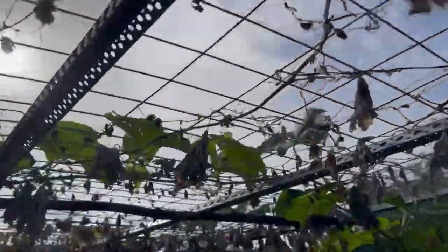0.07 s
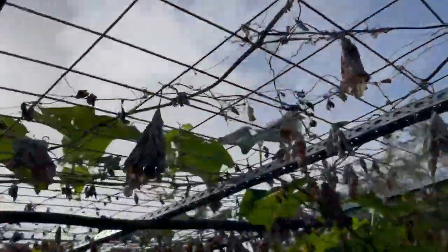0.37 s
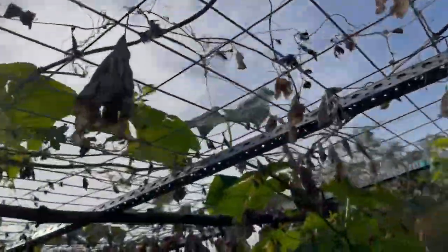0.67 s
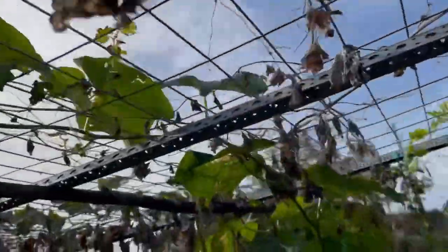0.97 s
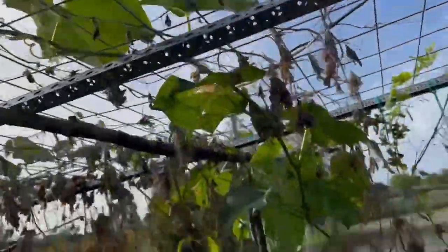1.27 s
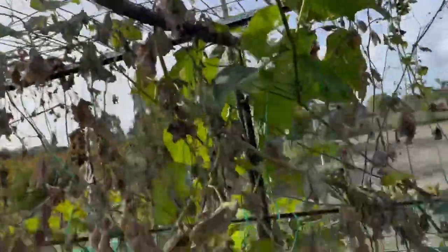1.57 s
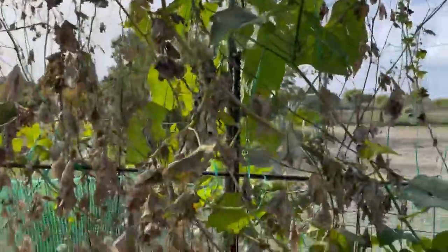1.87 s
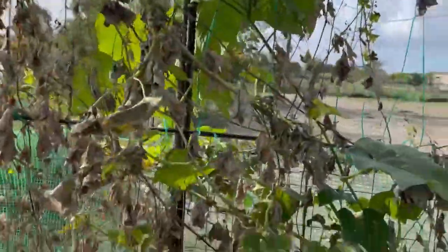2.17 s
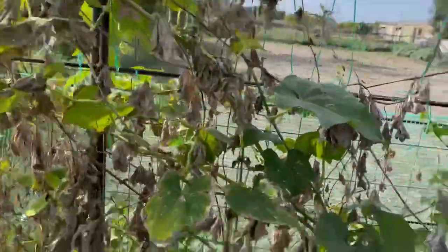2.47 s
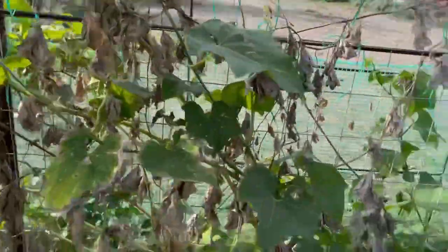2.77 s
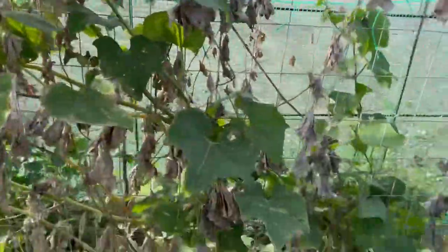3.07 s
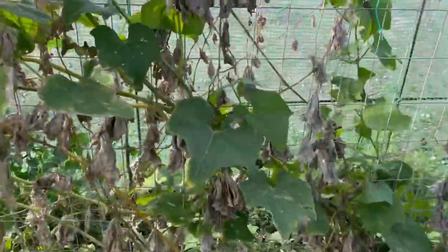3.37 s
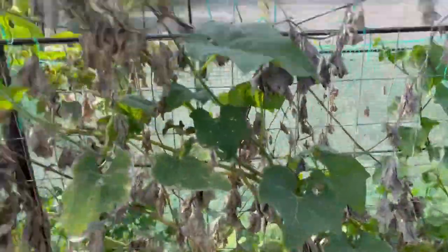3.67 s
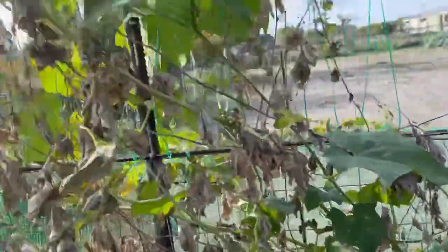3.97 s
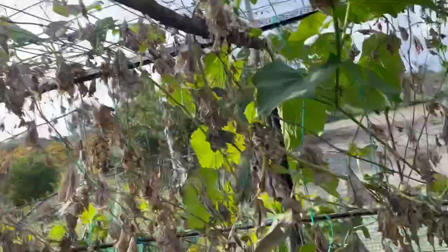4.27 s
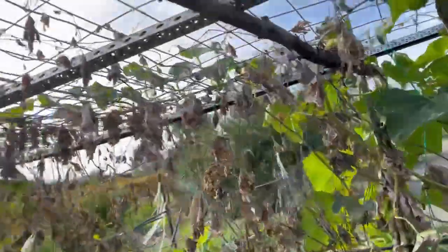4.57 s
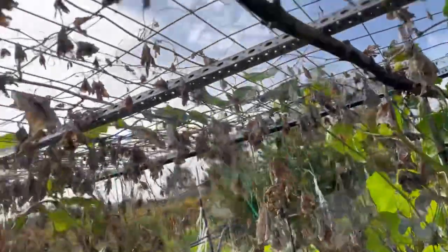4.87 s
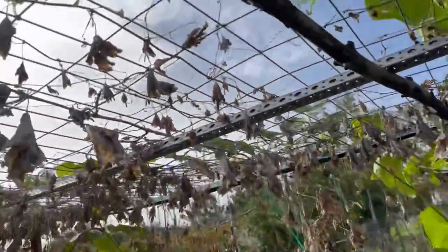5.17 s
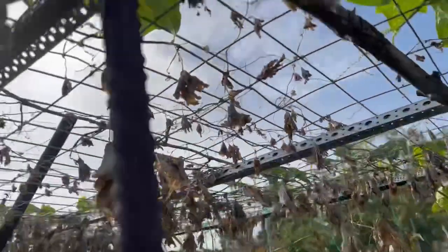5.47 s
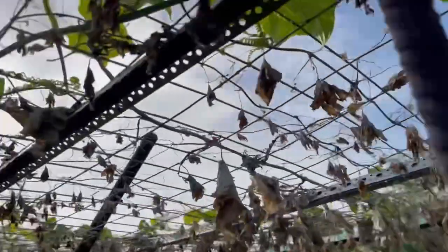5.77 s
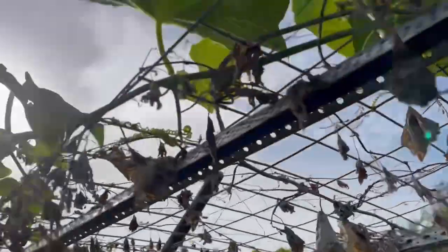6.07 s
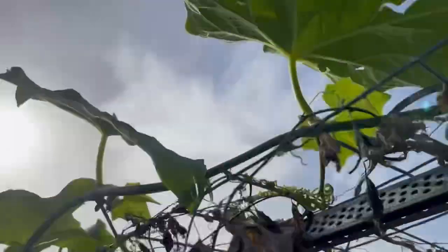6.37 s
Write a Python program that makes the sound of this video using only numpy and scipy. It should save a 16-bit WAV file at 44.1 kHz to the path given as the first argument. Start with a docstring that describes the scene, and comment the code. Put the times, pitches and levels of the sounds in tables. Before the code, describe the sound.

On a farm, a rooster crows once, close and loud: two quick notes, then a long hoarse one that clears, sinks and breaks off in a squawk. Before it, for well over three seconds, gusts buffet the microphone with a low rumble, over faint ticks of dry vine leaves and very faint far-off birds. After the crow the wind fades, leaving one soft rustle.

```python
"""A rooster crows once, in three syllables, near a trellis of half-dry vines on a farm.
The two sides of its syrinx clash into a rasp, then one side alone holds a clean falling note that
ends in a squawk; windpipe and beak colour the pulses, and trellis and yard scatter the call.
Wind buffets the microphone, dry leaves rustle, and far off there are faint birds and a hum."""
import sys
import numpy as np
from scipy import signal
from scipy.fft import rfft, irfft, next_fast_len
from scipy.io import wavfile
from scipy.ndimage import uniform_filter1d

SR = 44100
rng = np.random.default_rng(int(sys.argv[2]) if len(sys.argv) > 2 else 0)


def persist_wave(psi):
    """Save psi, clipped to +-1, as 16-bit WAV."""
    counts = np.round(np.clip(psi, -1, 1) * 32767).astype(np.int16)
    wavfile.write(sys.argv[1], SR, np.atleast_2d(counts).T)


N = 287973
TIME = np.arange(N) / SR
HZ = np.maximum(np.arange(N // 2 + 1) * SR / N, 1)
BREEZE_DB = -30   # typical wind strength
RASP_START_S, NOTE_START_S, SQUAWK_START_S, SQUAWK_END_S = 4.192, 5.277, 5.545, 5.585

# wind strength at the microphone: t/s, level/dB
GUSTS = [(0, -35), (.17, -35.5), (.31, -33), (.56, -30), (.63, -36.5), (.86, -30), (1.05, -29.5),
         (1.2, -37.5), (1.31, -30.5), (2.05, -30), (2.25, -27), (2.39, -32), (2.52, -26), (2.75, -27),
         (3.1, -33.5), (3.35, -35), (3.5, -37), (3.88, -32.5), (5.15, -33), (5.55, -42), (5.95, -46),
         (6.53, -60.5)]
# the straining membranes flutter ever slower and deeper: t/s, rate/Hz, depth at full roughness/dB
CATCHES = [(4.2, 75, .5), (4.7, 65, 1), (4.84, 53, 2.8), (5.0, 42, 2.5), (5.15, 38, 2.2), (5.25, 34, 7)]
# two short syllables: start/s, end/s, rise/s, upper side grips/s, lets go/s, upper f/Hz, lower f/Hz,
# pitch arch/share, upper side's share/0-1, roughness/0-1, fundamental/dB, throat/dB, edge/dB
OPENERS = [(3.705, 3.869, 0.028, 3.754, 3.838, 680, 597.7, .04, 0.65, .55, -26.5, -31, -47.5),
           (3.972, 4.086, 0.019, 3.993, 4.082, 733, 630.7, .035, 1, 0.05, -22.3, -24.8, -47)]


def from_db(db):
    """Decibels to gain."""
    return 10 ** (np.asarray(db) / 20)


def rms_one(x):
    """Scale to rms 1."""
    return x / np.sqrt(np.mean(x ** 2) + 1e-20)


def in_time(rows):
    """Automation lanes: each column of a curve at every sample."""
    s, *columns = np.transpose(rows)
    return [np.interp(TIME, s, c) for c in columns]


def phase_of(hz):
    """Running phase of a gliding frequency, in radians."""
    return 2 * np.pi * np.cumsum(hz) / SR


def filtered(x, response):
    """EQ with a response given on the HZ grid."""
    size = next_fast_len(N, True)
    grid = np.arange(size // 2 + 1) * SR / size
    return irfft(rfft(x, size) * np.interp(grid, HZ, response), size)[..., :N]


def drift(rate_hz):
    """Random wander up to a rate; rms 1."""
    return rms_one(filtered(rng.standard_normal(N), 1 / (1 + (HZ / rate_hz) ** 2)))


def noise(spectrum, alike):
    """Coloured stereo noise; alike is its left-right correlation."""
    hz, db = np.transpose(spectrum)
    skirts = np.minimum(HZ / hz[0], 1) ** 4 * np.minimum(hz[-1] / HZ, 1) ** 4
    colour = from_db(np.interp(np.log(HZ), np.log(hz), db)) * skirts
    mid, side = filtered(rng.standard_normal((2, N)), colour)
    width = np.sqrt((1 - alike) / (1.001 + alike))
    return rms_one(mid) + width * rms_one(side) * [[1], [-1]]


def evened(stereo, window_s):
    """Leveller: hold the slow level at 1 and keep the fast flutter."""
    power, size = stereo.mean(0) ** 2, int(window_s * SR)
    return stereo / np.sqrt(np.abs(uniform_filter1d(uniform_filter1d(power, size), size)) + 1e-12)


def bursts(rows, rise_s):
    """Envelope of events (t/s, level/dB, fade/s) that swell quickly and die away."""
    out = np.zeros(N)
    for s, db, fade_s in rows:
        start = int(s * SR)
        age = TIME[:min(N - start, SR // 2)]
        out[start:start + len(age)] += from_db(db) * (1 - np.exp(-age / rise_s)) * np.exp(-age / fade_s)
    return out


def surroundings():
    """The bed: a wash of open fields, an airy flickering hiss and a distant wavering hum."""
    # colours of the fields and of the hiss: f/Hz, density/dB
    field_colour = [(60, -17), (250, 5), (430, 1), (600, 9), (800, 2.5), (1000, 2), (1500, -3), (2200, -11),
                    (3500, -22.5), (6000, -17.5)]
    hiss_colour = [(1290, -16), (2200, -4.5), (5580, -5), (7050, -4.5), (8780, 2.5), (9360, 1.5),
                   (10200, -16), (11200, 5.5), (12000, -13), (15600, -49), (22000, -120)]
    # fader ride on the hiss: t/s, level/dB
    hiss_level = [(0, -68.5), (.5, -67), (.8, -63.5), (2.35, -63.5), (3, -65), (5.6, -63), (5.77, -73.5),
                  (6.25, -81.5), (6.53, -69)]
    hiss = from_db(in_time(hiss_level)[0] + .06 + 2 * drift(37)) * noise(hiss_colour, alike=.22)
    hum_hz = 626 + 4 * drift(23.4)
    hum = np.sqrt(2) * np.sin(phase_of(hum_hz)) * from_db(-63.5 + drift(12))
    return from_db(-58.5) * noise(field_colour, alike=.044) + hiss + hum


def far_birds():
    """Short wavering calls from across the fields."""
    # faint chirps: t/s, length/s, start f/Hz, end f/Hz, level/dB, waver/share
    calls = [(1.39, .05, 930, 880, -56, .03), (1.385, .06, 2050, 1950, -61, .12),
             (1.715, .04, 3030, 3090, -66, .008), (1.75, .11, 3090, 3300, -71, .03)]
    out, waver = np.zeros(N), drift(228)
    for s, length_s, start_hz, end_hz, db, depth in calls:
        along = np.clip((TIME - s) / length_s, 0, 1)
        pitch = (start_hz + along * (end_hz - start_hz)) * (1 + depth * waver)
        out += from_db(db) * np.sqrt(2) * np.sin(np.pi * along) * np.sin(phase_of(pitch))
    return out


def leaves(tick_db=-10, tick_fade_s=.011, grain_db=2.5, stir_s=.52, stir_spread_s=.24):
    """Dry leaves tick against the wires and brush past each other in fine grains."""
    # clearest leaf ticks: t/s, relative level/dB
    clear_ticks = [(0.4574, -43.5), (0.586, -40), (0.605, -38), (0.701, -39.5), (0.7312, -42.5),
                   (0.827, -46), (1.4616, -44)]
    # soft brushes through foliage: t/s, level/dB, fade/s
    strokes = [(0.10, -59.5, 0.29), (0.59, -63.5, 0.61), (1.44, -55, 0.053), (6.378, -52.5, 0.067)]
    # colours of a tick and of a brush: f/Hz, density/dB
    tick_colour = [(1500, -13), (3000, -3), (5000, 5), (7500, 6.5), (10000, -1), (12000, 2.5)]
    brush_colour = [(500, -26), (900, 7), (2000, 0.5), (3000, -7), (6000, -8.5), (9500, -8.5), (12000, -12)]
    # fainter ticks cluster around one stir of the vine
    faint_ticks = [(abs(s), -71) for s in rng.normal(stir_s, stir_spread_s, 6)]
    hits = [(s, db + tick_db, tick_fade_s) for s, db in list(clear_ticks) + faint_ticks]
    ticks = bursts(hits, rise_s=.00033) * noise(tick_colour, alike=.2)
    brushes = bursts(strokes, rise_s=.00052) * noise(brush_colour, alike=.22)
    return (ticks + brushes) * rms_one(from_db(grain_db * drift(380)))


def flutter_level(wind_db):
    """Flutter grows faster than rumble: 1.28 dB for each dB of wind."""
    return -35 + 1.28 * (wind_db - BREEZE_DB)


def wind(swirl_db=2.4, lull_db=3.5, tear_growth=2.9):
    """Eddies roll over the microphone ports: low rumble, lumpier flutter, tearing in strong gusts."""
    # colours of the three wind bands: f/Hz, density/dB
    rumble_colour = [(25, -55), (40, -9), (58, 4), (100, 1), (160, -5), (220, -9.5), (400, -42)]
    flutter_colour = [(110, -0.5), (200, -1.5), (300, -1.5), (450, -9.5), (650, -19.5), (900, -52),
                      (1400, -82), (2500, -53)]
    tear_colour = [(330, -1.5), (480, -2.5), (700, -4), (950, -21.5), (1300, -56)]
    swirl = drift(14)   # quick swells and short lulls within a gust
    wind_db = in_time(GUSTS)[0] + swirl_db * np.tanh(swirl) - lull_db * np.maximum(-swirl - .5, 0)
    tear_db = -52.5 + tear_growth * (wind_db - BREEZE_DB)
    eddies = drift(53)
    rumble = evened(noise(rumble_colour, alike=.72) * from_db(2 * eddies), window_s=.083)
    flutter = evened(noise(flutter_colour, alike=.74) * from_db(5.5 * eddies), window_s=.067)
    tear = evened(noise(tear_colour, alike=.19) * from_db(7.5 * eddies), window_s=.041)
    low_end = from_db(wind_db) * rumble + from_db(flutter_level(wind_db)) * flutter
    return from_db(.5) * low_end + from_db(tear_db) * tear


def lesser_buffets(count=12, spread_db=3.5):
    """Random eddies that follow the wind's strength: t/s, relative thump/dB, relative slap/dB."""
    s = rng.uniform(0, TIME[-1] - .1, count)
    db = flutter_level(np.interp(s, *np.transpose(GUSTS)))
    thump_dip, slap_dip = spread_db * rng.standard_normal((count, 2)).T
    return list(zip(s, db + 14 - thump_dip, db - 9 - slap_dip))


def buffets(thump_s=.00097, slap_s=.0004):
    """A strong eddy swings the pressure at the ports once, with a sharper slap and a turbulent wake."""
    # hardest buffets: t/s, relative thump/dB, relative slap/dB
    hardest = [(0.466, -14, -29.5), (0.555, -10, -29.5), (0.792, -6, -43), (0.857, -12.5, -23),
               (0.888, -6.5, -27.5), (0.961, -7.5, -31.5), (0.993, -6.5, -32.5), (1.037, -8.5, -48),
               (1.094, -8.5, -51), (1.33, -8, -32.5), (1.649, -27, -39.5), (1.73, -27, -31.5),
               (1.767, -13, -33), (1.951, -16, -36), (2.053, -15, -27.5), (2.112, -16, -23),
               (2.154, -19, -20), (2.282, -1, -28.5), (2.365, -16, -27.5), (2.433, -10, -27.5),
               (2.481, -28, -41), (2.519, -9, -39), (2.562, -14, -26.5), (2.593, -7, -24),
               (2.618, -24, -24), (2.695, -31, -18), (2.789, -36, -20), (2.837, -6, -27.5),
               (2.87, -11, -34), (2.975, -19, -28.5), (2.993, -29, -24.5), (3.039, -15, -27.5),
               (3.165, -19, -35), (3.369, -17, -31), (3.492, -25, -33.5), (3.903, -11, -27),
               (5.15, -21, -20.5), (5.528, -12, -32), (6.11, -22, -65), (6.3, -34, -50)]
    hits = list(hardest) + lesser_buffets()
    out, age = np.zeros((2, N)), TIME[:SR // 20]
    for (s, thump_db, slap_db), (pan_db, sign) in zip(hits, rng.standard_normal((len(hits), 2))):
        start = int(s * SR)
        ears = np.sign(sign) * from_db([[pan_db], [-pan_db]])
        for db, swing_s in ((thump_db - 11, thump_s), (slap_db - 3, slap_s)):
            along = (age - .004) / swing_s
            out[:, start:start + len(age)] += ears * from_db(db) * along * np.exp((1 - along ** 2) / 2)
    wakes = bursts([(s, slap_db - 2, .008) for s, _, slap_db in hits], rise_s=.0013)
    wake_colour = [(150, 10), (500, 15.5), (850, 1), (1300, -56), (2200, -52)]   # f/Hz, density/dB
    out += wakes * noise(wake_colour, alike=.19)
    return signal.sosfilt(signal.butter(4, 1500, fs=SR, output="sos"), out)


def scatter(x, t60_s, dull_hz):
    """Many small reflections that die away, different at each microphone."""
    age = TIME[:SR]
    tail = rng.standard_normal((2, SR)) * from_db(-60 * age / t60_s) * (1 - np.exp(-40 * age / t60_s))
    tail /= np.sqrt(np.sum(tail ** 2, axis=1, keepdims=True))
    return filtered(signal.fftconvolve(x, tail, axes=1)[:, :N], 1 / np.hypot(1, HZ / dull_hz))


def shelter(x):
    """Hard surfaces near the bird ring on after it, with left and right swapped."""
    # narrow rings: f/Hz, level/dB, width/Hz
    rings = [(1090, -1, 11), (1475, -18, 11), (2890, -4, 10)]
    return sum(from_db(db) * signal.lfilter(*signal.iirpeak(hz, hz / width_hz, fs=SR), x[::-1])
               for hz, db, width_hz in rings)


def formant(source, hz, width_hz, pan_db, lead, order):
    """One gliding resonance, placed in stereo by level and by phase lead."""
    centre = np.exp(1j * phase_of(hz))
    lowpass = signal.bessel(order, width_hz / 2, norm="mag", fs=SR, output="sos")
    ringing = centre * signal.sosfilt(lowpass, source / centre)
    sides = np.array([[.5], [-.5]])
    ears = from_db(sides * pan_db) * np.exp(1j * sides * lead)
    return (ears * ringing).real


def bright_edge(source):
    """Narrow upper resonances glide as the neck stretches, each swelling on its own."""
    # paths of the three resonances: t/s, f/Hz, level/dB
    ring = [(3.88, 2630, -54), (3.98, 2840, -47.5), (4.25, 2830, -45.5), (4.76, 2930, -47.5),
            (4.92, 2890, -44.5), (5.1, 2850, -47.5), (5.3, 2416, -58.5)]
    low_edge = [(3.84, 4720, -58), (4.03, 4460, -68), (4.65, 4700, -58.5), (4.9, 4870, -49),
                (5.1, 4950, -54.5), (5.25, 4600, -69)]
    mid_edge = [(3.85, 5830, -48), (4.0, 5200, -58), (4.28, 5300, -51.5), (4.7, 5470, -53),
                (5.05, 5800, -68), (5.32, 5990, -45.5), (5.55, 5710, -48.5)]
    out = 0
    for glide, width_hz, pan_db in zip((ring, low_edge, mid_edge), (152, 230, 370), (1, 3, 7.2)):
        hz, db = in_time(glide)
        ringing = formant(source, hz, width_hz, pan_db, lead=1, order=2)
        out += from_db(db) * evened(ringing, window_s=.02)
    return out


def windpipe(source, levels_db, trims_db=(.1, .3, -1.5)):
    """Resonances move with the neck and open with the beak; each register rides its own fader."""
    # the bird's posture: t/s, beak gape/0-1, neck stretch/0-1
    posture = [(3.86, 0.4, 0.5), (3.98, 0.52, 0.02), (4.25, 1, 0.3), (4.55, 0.85, 0.2), (4.78, 1, 0.96),
               (5.15, 0.47, 0.75), (5.22, 0.19, 0.7), (5.3, 0, 0)]
    # windpipe and beak resonances, low register to high: f/Hz, gape shift/Hz, stretch shift/Hz,
    # width/Hz, narrow-beak level/dB, gaping level/dB, left-right/dB, left lead/rad
    fundamental = [(677, 47, 22, 166, 2, 10, -13.5, -1.55)]
    throat = [(1174, -81, -8, 184, -2.5, -3.5, -5.5, -0.6), (1437, 24, -21, 201, 7.5, 2.5, 0, -1.04),
              (1745, 103, 108, 240, -3, -1.5, -1.5, -1.64), (2285, -52, 6, 220, -24, -11.5, 3, -2)]
    edge = [(6780, 0, 150, 710, 1, 6, 7.5, 0.63), (8080, 0, 0, 420, 1, 8.5, 1.5, 0.55),
            (9260, -200, -2, 520, -0.5, -8, 0, 0.34), (11220, 96, 100, 620, 1.5, -6, 1.5, .1)]
    gape, stretch = in_time(posture)
    out = 0
    for resonances, db, trim_db in zip((fundamental, throat, edge), levels_db, trims_db):
        register = 0
        for hz, gape_hz, stretch_hz, width_hz, narrow_db, gaping_db, pan_db, lead in resonances:
            centre_hz = hz + gape_hz * gape + stretch_hz * stretch
            gain = from_db(narrow_db + gape * (gaping_db - narrow_db))
            register += gain * formant(source, centre_hz, width_hz, pan_db, lead, order=4)
        out += from_db(db + trim_db) * evened(register, window_s=.013)
    return out


def opener(start_s, end_s, rise_s, grip_s, let_go_s, upper_hz, lower_hz, arch, share, rough,
           db, throat_db, edge_db):
    """A short syllable: the slack lower side starts, the upper leaps to an arched note, then lets go."""
    slacken_s, settle_s = .005, .24 * (end_s - start_s)
    grip = (np.tanh((TIME - grip_s) / slacken_s) - np.tanh((TIME - let_go_s) / slacken_s)) / 2
    slack = 1 - grip   # a slack syrinx is rough and dull
    along = np.clip(2 * (TIME - grip_s) / (let_go_s - grip_s) - 1, -2, 2)
    flat = .01 * np.exp(-np.maximum(TIME - start_s, 0) / settle_s)
    return (upper_hz * (1 - arch * along ** 2), lower_hz * (1 - flat), share * grip,
            rough * grip + .396 * slack, db, throat_db - 4.5 * slack, edge_db - 7 * slack)


def clean_note(rough=.025):
    """The lower side alone: pitch sags ever faster and overtones fade as the air runs out."""
    age = np.clip(TIME - NOTE_START_S, 0, SQUAWK_START_S - NOTE_START_S)
    hz = 605 - 20 * age - 580 * age ** 2
    db, throat_db, edge_db = -27.5, -29.5 - 256 * age ** 2, -49.5 - 17 * age
    return hz, hz, 0, rough, db, throat_db, edge_db


def squawk(rough=.25):
    """A last rough push: the pitch plunges and the throat rings above a weak fundamental."""
    age = np.clip(TIME - SQUAWK_START_S, 0, .05)
    hz, fade_db = 520 - 1700 * age, 156 * age
    return hz, hz, 0, rough, -38 - fade_db, -23.5 - fade_db, -54 - fade_db


def crow_controls(blend_s=.009):
    """The crow's automation: upper and lower pitch, upper side's share, roughness, register levels."""
    # the long syllable opens as a rasp: t/s, upper f/Hz, lower f/Hz, upper side's share/0-1, roughness
    rasp = [(4.21, 785, 613, 0.47, .9), (4.28, 731.4, 611, 0.93, 0.42), (4.44, 717.8, 620.8, 0.7, 0.89),
            (4.55, 711.2, 621, 0.28, 0.93), (4.75, 751, 625.2, 0.32, 0.9), (4.95, 734.6, 624.5, 0.55, 1.07),
            (5.15, 708, 623, 0.65, 0.89), (5.21, 657, 626.3, 0.16, 0.63), (5.27, 644, 603, 0.21, 0.29)]
    # its loudness: t/s, fundamental/dB, throat/dB, edge/dB
    rasp_level = [(4.22, -23.5, -26.5, -48), (4.28, -25, -31, -44), (4.45, -25, -28, -49),
                  (4.6, -25, -29, -50), (4.92, -27, -26.5, -47), (5.14, -31, -24.5, -51.5),
                  (5.27, -26.5, -26, -51)]
    parts = [(row[0] - blend_s, opener(*row)) for row in OPENERS]
    parts.append((RASP_START_S - blend_s, in_time(rasp) + in_time(rasp_level)))
    parts += [(NOTE_START_S, clean_note()), (SQUAWK_START_S, squawk())]
    controls = parts[0][1]
    for start_s, part in parts:
        controls = [np.where(TIME < start_s, before, after) for before, after in zip(controls, part)]
    return uniform_filter1d(np.array(controls), int(blend_s * SR))


def syrinx_side(hz, rough, catch, jitter, shimmer, doubling, rasp):
    """One membrane's pulses; roughness shakes timing and size, alternates them and adds turbulence."""
    rough = np.clip(rough, 0, 1)
    shake = jitter * rough * (drift(69) + .5 * catch) + .003 * drift(22)
    slip = .2 * rough * drift(490)   # early and late pulses blur the highest overtones
    phase = phase_of(hz * (1 + shake)) + slip
    pulses = sum(np.cos(k * phase + k * k / 2) for k in range(1, 21))
    size = 1 + rough * (shimmer * drift(47) + doubling * np.cos(phase / 2))
    breath = filtered(rng.standard_normal(N), 1 / np.hypot(1, HZ / 3000))
    turbulence = rasp * rough * breath * (1 + np.cos(phase))
    catch_db = in_time(CATCHES)[1] * rough * catch
    return (pulses * size + turbulence) * from_db(-catch_db)


def syrinx(upper_hz, lower_hz, share, rough, trade_hz=24, clash=.9):
    """Two membranes at different pitches trade the lead and beat against each other into a rasp."""
    # how far the upper side's pitch strays: t/s, spread at full roughness/share
    stray = [(4.25, .012), (4.5, .025), (4.8, .04), (5.15, .04), (5.25, .02)]
    share = np.clip(share + .25 * rough ** 2 * drift(trade_hz), 0, 1)
    upper_hz = upper_hz * (1 + in_time(stray)[0] * rough * drift(trade_hz))
    # the membranes catch and break free again every dozen cycles or so
    catch = np.cos(phase_of(in_time(CATCHES)[0] * (1 + .25 * drift(30))))
    upper = syrinx_side(upper_hz, .8 * rough, catch, jitter=.008, shimmer=1.05, doubling=.7, rasp=1.5)
    lower = syrinx_side(lower_hz, rough, catch, jitter=.016, shimmer=1, doubling=.082, rasp=2.5)
    beat = np.cos(phase_of(upper_hz - lower_hz + 25 * drift(37.3)))
    both = np.sqrt(share) * upper + np.sqrt(1 - share) * lower
    return both * (1 + clash * np.sqrt(share * (1 - share)) * beat)


def envelope(start_s, end_s, rise_s, release_s=.014):
    """Straight attack, hold, and a quick dying release."""
    return np.clip((TIME - start_s) / rise_s, 0, 1) * np.exp(-np.maximum(TIME - end_s, 0) / release_s)


def rooster():
    """Both sides of the syrinx sound through one windpipe: two short syllables and a long one."""
    upper_hz, lower_hz, share, rough, *levels_db = crow_controls()
    source = syrinx(upper_hz, lower_hz, share, rough)
    short_syllables = sum(envelope(start, end, rise) for start, end, rise, *_ in OPENERS)
    long_syllable = envelope(RASP_START_S, SQUAWK_END_S, rise_s=.049)
    return (short_syllables + long_syllable) * (windpipe(source, levels_db) + bright_edge(source))


def scene():
    """The crow, scattered by the trellis and the yard, over wind, leaves and fields."""
    crow = rooster()
    # leaves and wires are too small to reflect much of the fundamental
    overtones = filtered(crow, HZ / np.hypot(HZ, 2200))
    trellis = from_db(-3) * scatter(overtones, t60_s=.09, dull_hz=11800)
    yard = from_db(-24) * scatter(crow, t60_s=.7, dull_hz=4000)
    ambience = wind() + buffets() + leaves() + far_birds() + surroundings()
    return crow + trellis + shelter(crow) + yard + ambience


def record(dry):
    """The microphone sheds the deepest rumble; the top is cut steeply."""
    lean = signal.sosfilt(signal.butter(4, 36, "high", fs=SR, output="sos"), dry)
    return signal.sosfiltfilt(signal.ellip(10, .05, 70, 12100, fs=SR, output="sos"), lean)


dry = scene()
out = record(dry)
persist_wave(out)
```